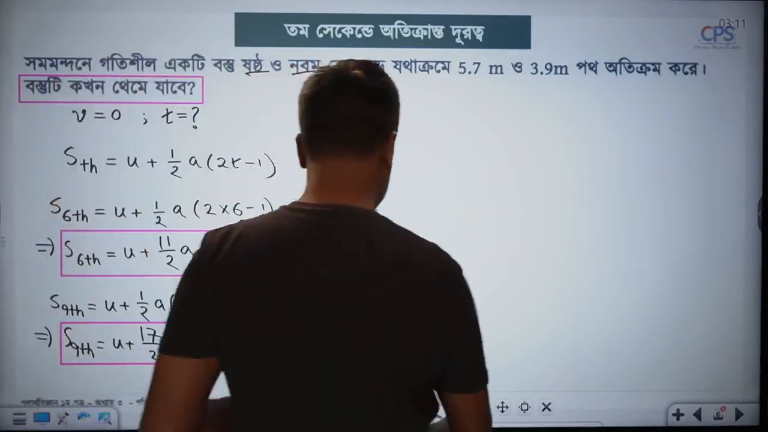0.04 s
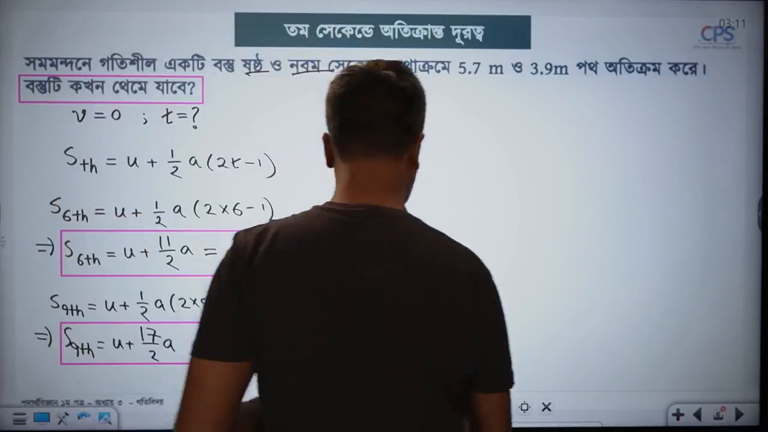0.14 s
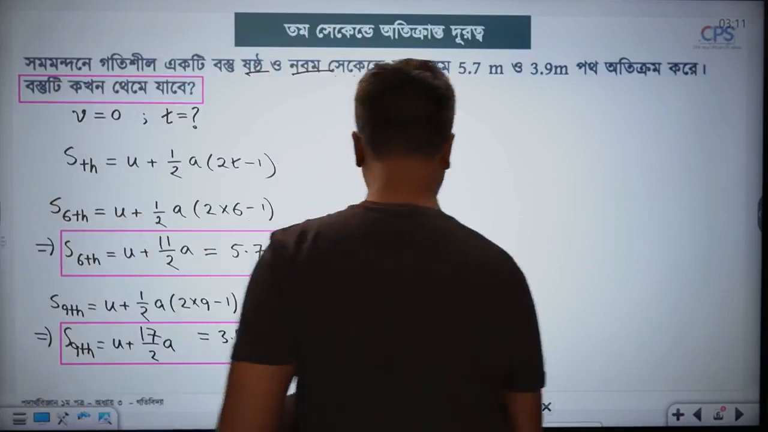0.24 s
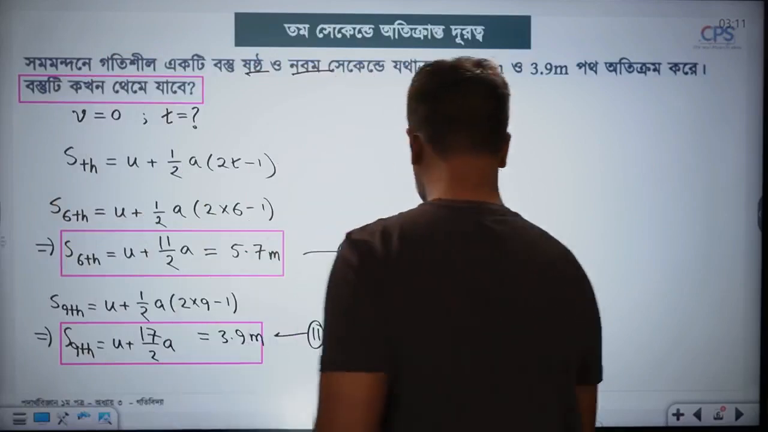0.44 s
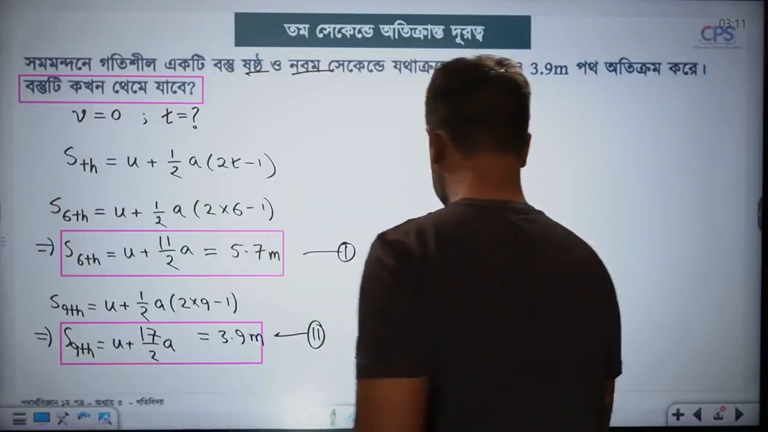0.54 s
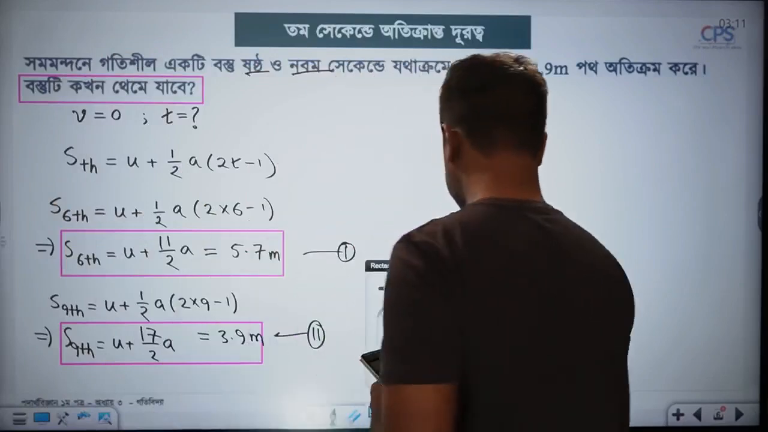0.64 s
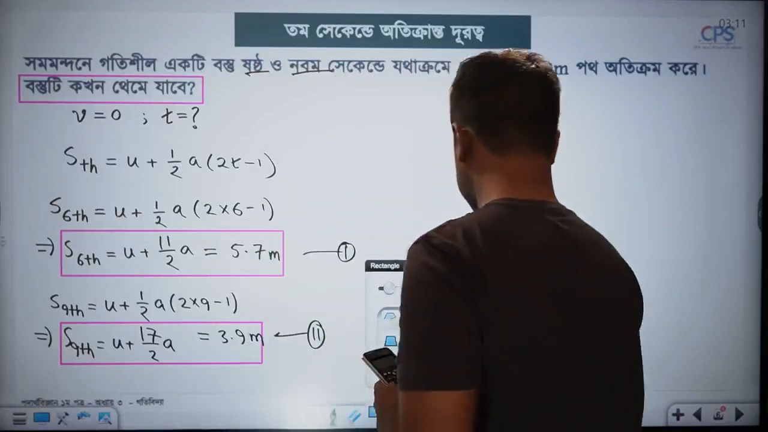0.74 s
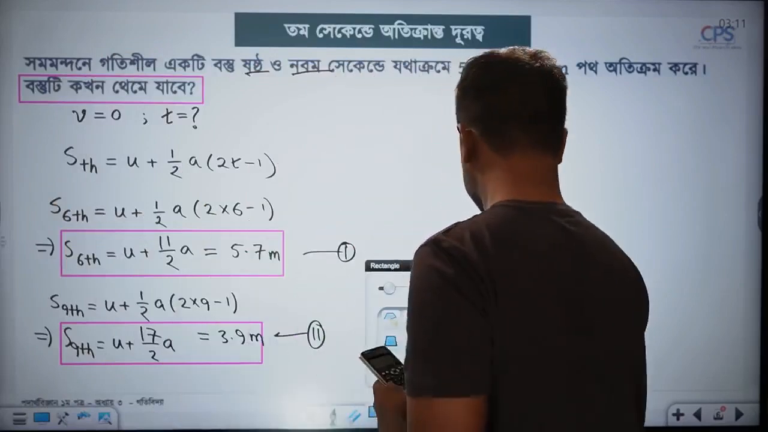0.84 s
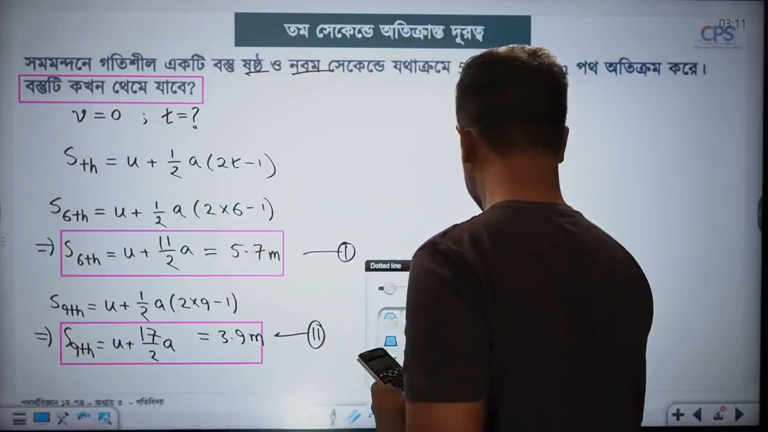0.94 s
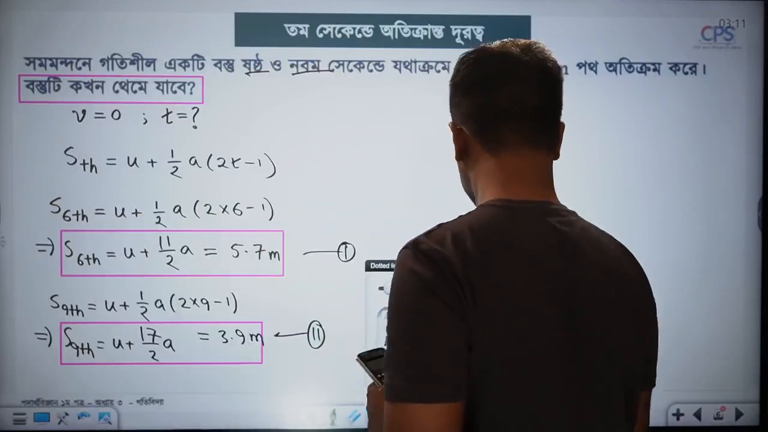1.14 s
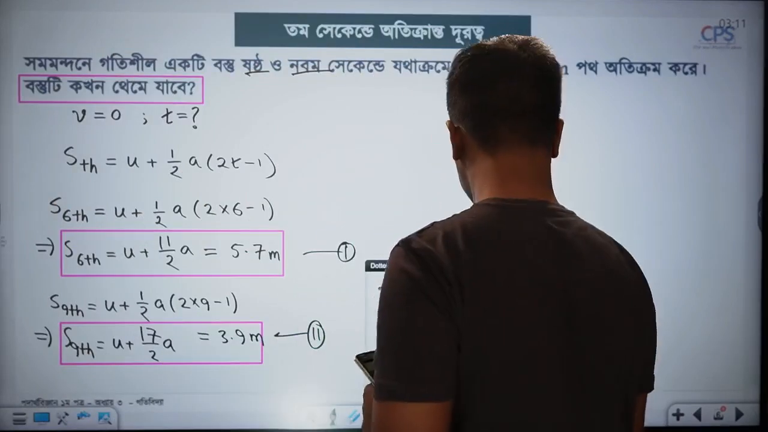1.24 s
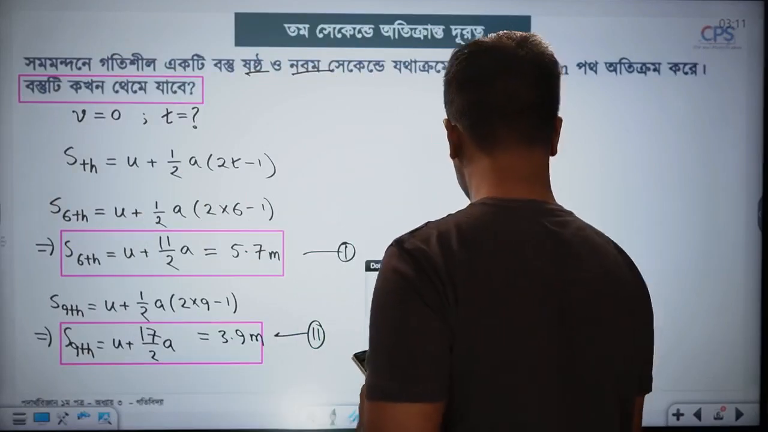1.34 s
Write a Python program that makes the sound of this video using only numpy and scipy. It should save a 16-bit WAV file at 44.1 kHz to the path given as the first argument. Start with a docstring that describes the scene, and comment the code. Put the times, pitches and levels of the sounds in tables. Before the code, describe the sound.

Calculator keys click unevenly, two in quick succession and one later, each dull knock ending in a crisp crack and short room echo; very faint shirt rustle and low room tone lie beneath, miked close.

```python
"""Room tone, a wavering fan hum and a soft shirt rustle; then three firm presses on calculator keys.
Each press is a dull plastic knock: damped case modes pushed softly, then bright modes and a crack at the stop.
A small hard-walled classroom answers at once and dies in about a third of a second over most of the band.
Tone and cloth are coloured noise, the cloth in swells as the person moves; the hum is a wavering sine."""
import sys
import numpy as np
from scipy import signal
from scipy.fft import rfft, irfft, next_fast_len
from scipy.io import wavfile
from scipy.ndimage import uniform_filter1d, map_coordinates

SR = 44100
rng = np.random.default_rng(int(sys.argv[2]) if len(sys.argv) > 2 else 0)


def waveform_to_disk(signal):
    """Save audio, clipped to [-1, 1], as 16-bit WAV at the path in sys.argv[1]."""
    frames = np.transpose(np.atleast_2d(signal))
    scaled = np.clip(frames, -1, 1) * 32767
    samples = np.round(scaled).astype(np.int16)
    wavfile.write(sys.argv[1], SR, samples)


def makeup_ratio(level_db):
    """Linear amplitude ratio for a level in decibels (20 dB per factor of ten)."""
    decades = np.asarray(level_db, float) / 20
    return 10 ** decades


N = 61739

# key presses; the key's place decides what rings, the hand muffles the thud:
# start_s, level_db, deep_db, middle_db, bright_db, crack_db, thud_lowpass_hz
KEY_PRESSES = [(.2016, -20, -8.5, -2.5, 0, -3.5, 1400), (.3505, -26.5, 2.5, -2.5, 3, -1.5, 1157),
               (1.0072, -21, -0.5, -22.5, 9, 1, 1560)]
# modes of the hand-held case, four groups: pitch_hz, level_db, t60_s
CORE_MODES = [(1099, -1.5, 0.014), (1520, -37, 0.004), (830, -7, 0.0095), (174.8, -18, 0.084)]
DEEP_MODES = [(346.6, -10, 0.028), (274, -11, 0.035)]
MIDDLE_MODES = [(231.5, -13.5, 0.044), (458.4, -9, 0.069), (545, -6, 0.012)]
BRIGHT_MODES = [(2128, -23.5, 0.021), (2487, -23, 0.0061), (3017, -23, 0.0058), (4100, -35.5, 0.0036)]
# crack and chatter colour: freq_hz, gain_db
CRACK_COLOUR = [(1500, -38), (2500, 4.5), (3200, 6), (4200, 3), (5000, -1.5), (6400, 1), (7700, -7.5),
                (8500, 0.5), (12000, -8.5), (15500, -12), (16600, -21)]
# room decay: freq_hz, t60_s
ROOM_DECAY = [(100, 0.61), (260, 0.39), (700, 0.32), (1800, 0.31), (5000, 0.26), (14000, 0.37)]
# diffuse tail colour, relative: freq_hz, gain_db
TAIL_COLOUR = [(100, -18), (170, 2), (400, 2.5), (1000, -2.5), (1500, -4), (2300, 4.5), (3300, -6.5),
               (5000, 3), (14000, 2.5), (15600, 6), (15900, -40)]
# nearest surfaces: delay_s, level_db
NEAR_SURFACES = [(.004, -22), (.0073, -11), (0.0125, -10.5), (0.0199, -17)]
# shirt rustles: peak_s, level_db, rise_sigma_s, fall_sigma_s
SHIRT_RUSTLES = [(.02, -70, 0.017, 0.077), (0.224, -63.5, 0.012, 0.032), (1.035, -65, 0.0064, 0.031),
                 (0.443, -63, 0.0093, 0.03), (.6, -75.5, 0.022, 0.072), (.755, -66.5, 0.042, 0.065),
                 (1.21, -71.5, 0.059, 0.077)]
# cloth colour, relative: freq_hz, gain_db
SHIRT_COLOUR = [(500, 1), (1200, -1.5), (3500, 1), (6500, -6), (7700, -13.5), (8400, -0.5), (15400, -19.5),
                (15900, -56)]
# room tone colour, relative: freq_hz, gain_db
TONE_COLOUR = [(20, -18.5), (85, -14.5), (125, -9), (220, -5), (300, -5.5), (550, -10), (700, -16),
               (1300, -17.5), (2000, -23.5), (7000, -32.5), (7700, -36), (8400, -31.5), (15500, -33),
               (15900, -78)]
# room tone level before its waver: time_s, level_db
TONE_LEVEL_CURVE = [(0.0, -59.5), (0.24, -59), (0.372, -64.5), (0.668, -59.5), (0.828, -65.5),
                    (1.132, -64.5), (1.4, -61)]

CONTACT_S, MODE_SCATTER_DB = 0.00014, 3  # sigma of the key's soft landing; random spread of mode levels
CRACK_DB = -9
CHATTER_DB, CHATTER_T60_S = -26.5, 0.033  # loose key cap, close by; level relative to the press's crack
TAIL_DB, FIRST_WALL_S = 1.5, 0.003
DIRECT_S = 0.00054
LOW_CUT_HZ = 84
HUM_HZ, HUM_DB, HUM_WAVER_DB, HUM_WAVER_RAD = 120, -69, 1.5, 0.5


def keys():
    """A soft push accelerates the low case modes; the hard stop rings bright modes and cracks; the room answers."""
    out = np.zeros(N + 2 * SR)
    t = np.arange(SR // 20) / SR
    push = np.exp(-0.5 * (t / CONTACT_S - 2.5) ** 2)
    push /= push.sum()
    stop = round(6 * CONTACT_S * SR)
    for start_s, level_db, deep_db, middle_db, bright_db, crack_db, lowpass_hz in KEY_PRESSES:
        dull = ring(CORE_MODES, t)
        dull = dull + makeup_ratio(deep_db) * ring(DEEP_MODES, t)
        dull = dull + makeup_ratio(middle_db) * ring(MIDDLE_MODES, t)
        velocity = np.convolve(dull, push)[:len(t)]
        thud = -np.diff(velocity, prepend=0)
        thud = signal.sosfilt(signal.butter(4, lowpass_hz, fs=SR, output="sos"), thud)

        onset = 1 - np.exp(-t / CONTACT_S)
        bright = makeup_ratio(bright_db) * np.gradient(ring(BRIGHT_MODES, t)) * onset
        bright = np.pad(bright, (stop, 0))[:len(t)]
        crack = makeup_ratio(CRACK_DB + crack_db) * click(CRACK_COLOUR)
        crack = np.pad(crack, (stop, 0))[:len(t)]

        knock = makeup_ratio(level_db) * (thud + bright + crack)
        heard = signal.fftconvolve(knock, classroom())
        heard[stop:][:len(t)] += makeup_ratio(level_db + crack_db) * chatter(t)
        out[round(start_s * SR):][:len(heard)] += heard
    return signal.sosfilt(signal.butter(2, LOW_CUT_HZ, "high", fs=SR, output="sos"), out[:N])


def ring(modes, t):
    """Velocity of damped modes after a unit push, scaled so their acceleration has the given level."""
    total = 0
    for pitch_hz, level_db, t60_s in modes:
        scatter_db = MODE_SCATTER_DB * rng.standard_normal()
        envelope = makeup_ratio(level_db + scatter_db - 60 * t / t60_s)
        omega = 2 * np.pi * pitch_hz
        total = total + envelope * np.cos(omega * t) * SR / omega
    return total


def click(points):
    """A single impulse given this colour, causally (minimum phase)."""
    log_gain = np.log(makeup_ratio(along(points, np.fft.rfftfreq(4096, 1 / SR))))
    cepstrum = irfft(log_gain)
    cepstrum[1:2048] *= 2  # fold to the causal side
    cepstrum[2049:] = 0
    return irfft(np.exp(rfft(cepstrum)))


def chatter(t):
    """The loose key cap's brief buzz: decaying coloured noise."""
    buzz = hiss(CRACK_COLOUR, patchy_db=0)[:len(t)]
    return makeup_ratio(CHATTER_DB - 60 * t / CHATTER_T60_S) * buzz


def classroom():
    """One room response: direct sound and near surfaces on a diffuse tail that dies by band."""
    hz, t, z = signal.stft(rng.standard_normal(SR // 2), SR, nperseg=256)
    colour_db = along(TAIL_COLOUR, hz)[:, None]
    decay_db = 60 * t / along(ROOM_DECAY, hz)[:, None]
    tail = signal.istft(z * makeup_ratio(colour_db - decay_db), SR, nperseg=256)[1]
    tail = makeup_ratio(TAIL_DB) * tail / np.linalg.norm(tail)
    answer = np.pad(tail, (round(FIRST_WALL_S * SR), 0))
    answer[round(DIRECT_S * SR)] += 1
    for delay_s, level_db in NEAR_SURFACES:
        answer[round(delay_s * SR)] += makeup_ratio(level_db)
    return answer


def shirt():
    """Cloth sliding: soft swells of airy hiss."""
    t = np.arange(N) / SR
    swell = np.zeros(N)
    for peak_s, level_db, rise_s, fall_s in SHIRT_RUSTLES:
        sigma_s = np.where(t < peak_s, rise_s, fall_s)
        swell += makeup_ratio(level_db) * np.exp(-0.5 * ((t - peak_s) / sigma_s) ** 2)
    return swell * makeup_ratio(2.4 * wobble(25)) * hiss(SHIRT_COLOUR, patchy_db=0.2)


def room_tone():
    """Low air noise of wavering level, plus the fan hum."""
    t = np.arange(N) / SR
    time_s, level_db = np.transpose(TONE_LEVEL_CURVE)
    air_db = np.interp(t, time_s, level_db) + 3.6 * wobble(7.43)
    air = makeup_ratio(air_db) * hiss(TONE_COLOUR, patchy_db=0.0)
    return air + fan_hum(t)


def fan_hum(t):
    """A sine whose level and phase waver at random."""
    level = makeup_ratio(HUM_DB + HUM_WAVER_DB * wobble(15.4))
    phase = 2 * np.pi * HUM_HZ * t + HUM_WAVER_RAD * wobble(25)
    return np.sqrt(2) * level * np.sin(phase)  # sqrt(2): level is rms


def hiss(spectrum, patchy_db):
    """Coloured noise of rms 1 with time-frequency patches of random gain."""
    z = signal.stft(rng.standard_normal(N + 512), nperseg=512)[2]
    field = uniform_filter1d(rng.standard_normal(z.shape), size=5, axis=0)
    field = uniform_filter1d(field, size=6, axis=1)
    x = signal.istft(z * makeup_ratio(patchy_db * unit(field)), nperseg=512)[1]
    m = next_fast_len(N + 8192)
    gain = makeup_ratio(along(spectrum, np.fft.rfftfreq(m, 1 / SR)))
    return unit(irfft(rfft(x, m) * gain, m)[:N])


def wobble(rate_hz):
    """A smooth random curve through rate_hz knots a second, 40 at most."""
    knots = rng.standard_normal(int(N * 40 / SR) + 4)
    return map_coordinates(knots, [np.arange(N) * min(rate_hz, 40) / SR])


def along(points, hz):
    """(Hz, value) points interpolated on a log frequency axis."""
    f, v = np.transpose(points)
    return np.interp(np.log(hz + 1), np.log(f + 1), v)


def unit(x):
    """Scaled to rms 1."""
    return x / np.sqrt(np.mean(x ** 2) + 1e-20)


def scene():
    """Keys in their room, over tone and cloth; one channel."""
    return (keys() + room_tone() + shirt())[None]


def top_cut(x):
    """Nothing passes above the cut-off."""
    return signal.sosfilt(signal.butter(12, 16500, fs=SR, output="sos"), x)


def record(dry):
    """The finished mix, levels as set."""
    return top_cut(dry)


dry = scene()
out = record(dry)
waveform_to_disk(out)
```